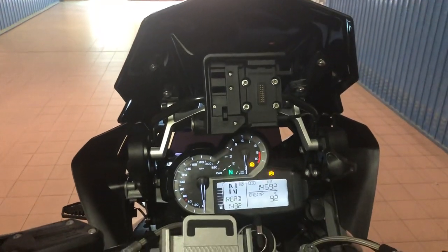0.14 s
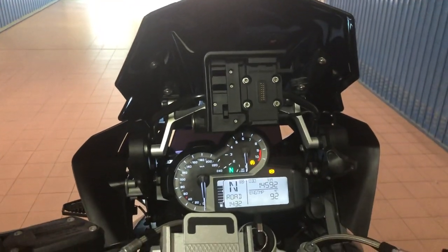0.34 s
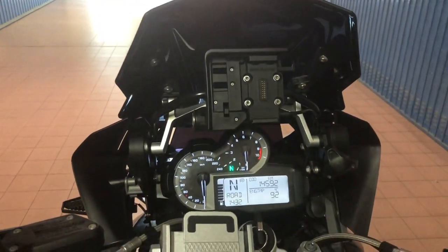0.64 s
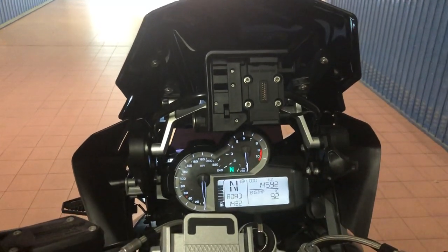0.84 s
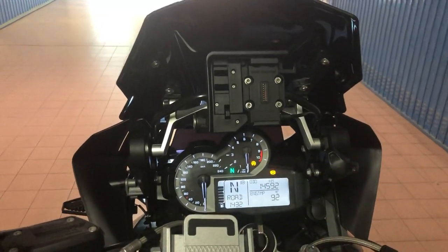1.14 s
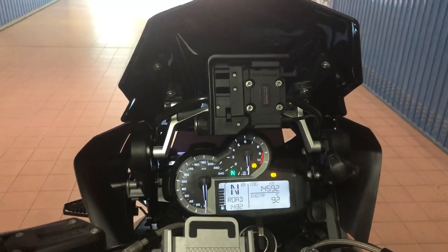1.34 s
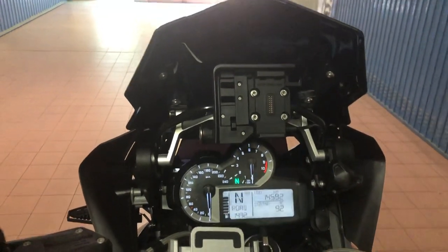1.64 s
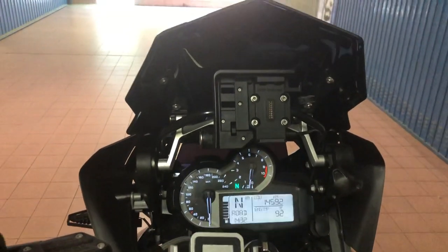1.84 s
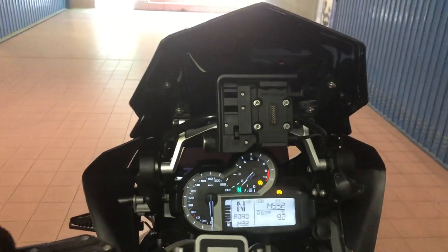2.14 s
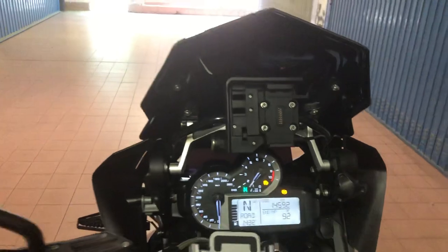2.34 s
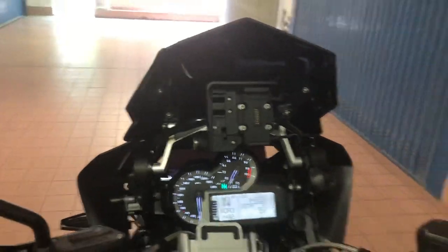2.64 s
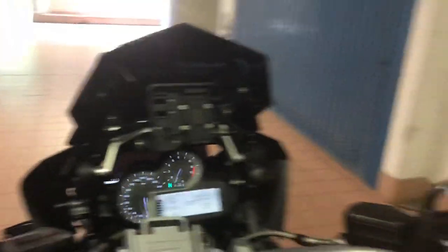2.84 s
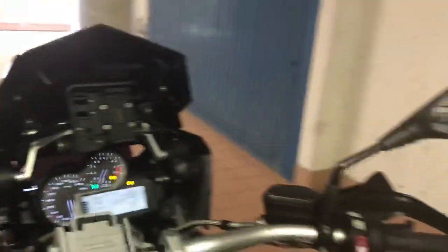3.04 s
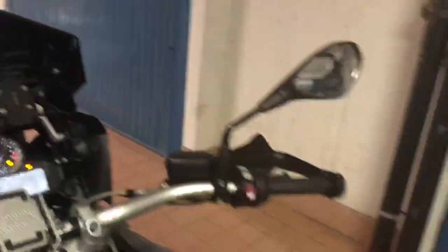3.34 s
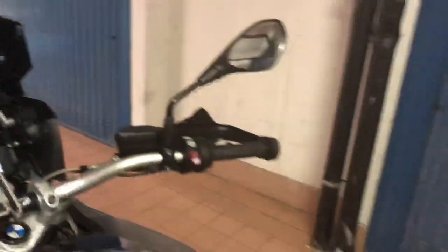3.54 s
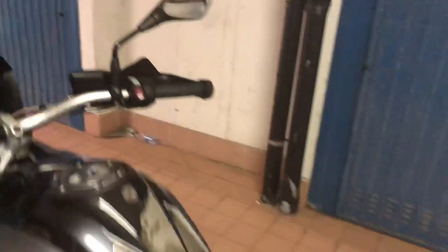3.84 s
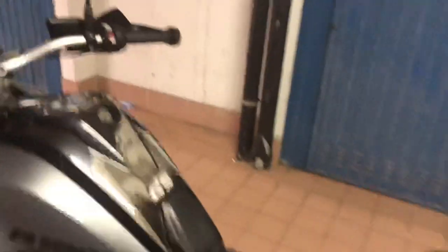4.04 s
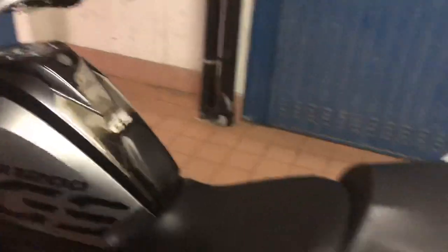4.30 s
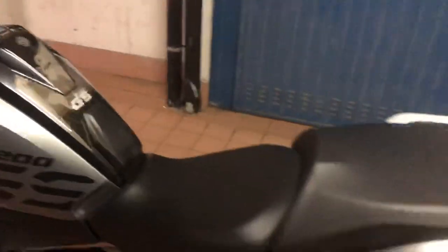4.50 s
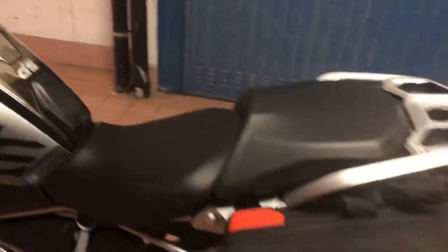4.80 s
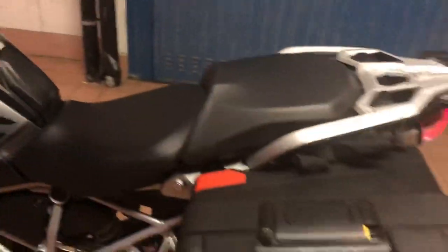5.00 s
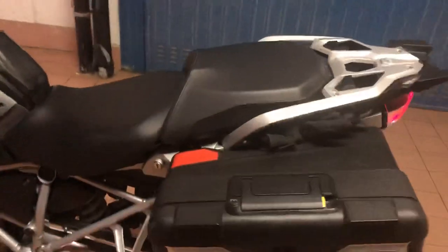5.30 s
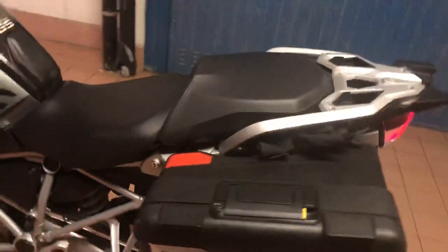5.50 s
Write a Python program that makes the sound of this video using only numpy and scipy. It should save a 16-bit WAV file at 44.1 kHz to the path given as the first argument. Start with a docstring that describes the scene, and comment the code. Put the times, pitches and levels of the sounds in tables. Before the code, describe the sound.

In a reverberant tiled corridor, faint low electric hum is broken by a loud switch snap at the handlebars. Small clicks and a soft whirr lead to a short, sagging starter whine; the motorcycle catches with heavy booming bangs, revs quickly sink, and it idles evenly. The close microphone moves back past the tank to the tail, where the deep exhaust throb grows more direct.

```python
"""Motorcycle start in a tiled corridor

A boxer-twin is started over a faint electric hum. Switches snap as noise bursts shaped by a body response.
The starter whines as harmonics of a gear-mesh rate that sags in two compressions. The engine catches with
bangs of decaying silencer modes, and its speed sinks to idle: one exhaust pulse a turn, filtered by place,
over impacts that ring the case. The microphone moves from the handlebars back towards the silencer."""
import sys
import numpy as np
from scipy import signal
from scipy.fft import irfft
from scipy.io import wavfile
from scipy.ndimage import uniform_filter1d

SR = 44100
rng = np.random.default_rng(int(sys.argv[2]) if len(sys.argv) > 2 else 0)


def transcribe(signal):
    """Save signal, clipped to [-1, 1], as a 16-bit WAV file at the path in sys.argv[1]."""
    frames = np.atleast_2d(signal).T
    limited = np.clip(frames, -1, 1)
    pcm = np.round(limited * 32767).astype(np.int16)
    wavfile.write(sys.argv[1], SR, pcm)


N = 249606
T = np.arange(N) / SR  # time, s
IDLE_HZ = 19.35  # nominal idle, firings a second

# mean engine speed from the first free turn to idle, one firing a turn: [t/s, firing rate/Hz]
SPEED_TRACK = [(1.9367, 30.33), (2.0, 29.76), (2.27, 25.4), (2.36, 20.72), (2.6, 19.366)]
# way of the microphone: [t/s, place: 0 handlebars, 1 tank, 2 tail]
MICROPHONE_PATH = [(3.45, 0.14), (3.95, 0.83), (4.5, 1.1), (4.75, 1.62), (5.66, 1.88)]

ENGAGE_S, DROP_S = 1.484, 1.825  # the starter engages and drops out, s


def amp(db):
    """Amplitude ratio of a level in decibels."""
    return 10 ** (np.asarray(db) / 20)


def unit(x):
    """Normalization to an rms of 1."""
    return x / np.sqrt(np.mean(x ** 2) + 1e-20)


def curve(rows):
    """Linear interpolation in time of rows [t/s, value]."""
    return np.interp(T, *np.transpose(rows))


def read(points, hz):
    """Interpolation of a spectrum on a logarithmic frequency axis."""
    f, value = np.transpose(points)
    return np.interp(np.log(hz + 1), np.log(f + 1), value)


def ring(points, size=16384):
    """Minimum-phase response: the Hilbert transform of the log gain gives the phase; energy 1."""
    log_gain = np.log(amp(read(points, np.fft.rfftfreq(size, 1 / SR))))
    mirrored = np.r_[log_gain, log_gain[-2:0:-1]]
    phase = -signal.hilbert(mirrored).imag[:len(log_gain)]
    h = irfft(np.exp(log_gain + 1j * phase))[:size // 2]
    return h / np.linalg.norm(h)


def through(x, h):
    """Linear filtering: convolution with an impulse response."""
    return signal.oaconvolve(x, h)[:N]


def noise():
    """White noise, a flat spectrum of rms 1."""
    return rng.standard_normal(N)


def strikes(rows):
    """Ideal impulses, one for each row [t/s, level/dB]."""
    s, db = np.transpose(rows)
    return np.bincount(np.round(s * SR).astype(int), amp(db), N)[:N]


def burst(decay_s, size=4096):
    """Noise under an exponential decay, as from a brief rubbing contact."""
    return rng.standard_normal(size) * np.exp(-np.arange(size) / SR / decay_s)


def hits(rows, colour, decay_s):
    """Struck bodies: noise bursts filtered by a body response, each scaled to its peak level."""
    out = np.zeros(N)
    body = ring(colour, size=4096)
    for s, db in rows:
        blow = signal.fftconvolve(burst(decay_s), body)
        part = out[round(s * SR):][:len(blow)]
        part += amp(db) * blow[:len(part)] / abs(blow).max()
    return out


def impacts(per_s, spread_db):
    """Poisson-like impacts of random sign, their levels spread exponentially above a floor."""
    size = amp(spread_db * np.minimum(rng.exponential(1, N), 4)) * rng.choice([-1, 1], N)
    return size * (rng.random(N) < per_s / SR)


def corridor(x, wet_db):
    """Reverberation of tiled walls: a diffuse tail whose bands each decay exponentially."""
    # reverberation time of the corridor: [f/Hz, t60/s]
    wall_decay = [(100, 1), (500, 0.88), (2800, 0.82), (6000, 1), (14000, 0.16)]
    hz, t, z = signal.stft(rng.standard_normal(SR), SR, nperseg=256)
    decay = amp(-60 * t / read(wall_decay, hz)[:, None])
    tail = signal.istft(z * decay, SR, nperseg=256)[1]
    tail *= np.minimum(np.arange(len(tail)) / SR / 0.003, 1)  # 3 ms onset
    return x + amp(wet_db) * through(x, tail / np.linalg.norm(tail))


def scatter(x, width_hz, count):
    """Standing waves as all-pass resonances: narrow bass bands are delayed at unchanged level."""
    r = np.exp(-np.pi * width_hz / SR)
    for hz in 60 + 380 * (np.arange(count) + rng.random(count)) / count:
        poles = np.array([1, -2 * r * np.cos(2 * np.pi * hz / SR), r * r])
        x = signal.lfilter(poles[::-1], poles, x)
    return x


def place():
    """Source-receiver geometry as one coordinate: 0 handlebars, 1 tank, 2 tail."""
    return np.clip(curve(MICROPHONE_PATH), 0, 2)


def speed():
    """Rotation rate as firings a second: a falling mean with a slow sinusoidal hunting."""
    swing_hz, period_s, top_s = 0.257, 1.031, 4.552
    return curve(SPEED_TRACK) + swing_hz * np.cos(2 * np.pi * (T - top_s) / period_s)


def revs():
    """Speed on an octave scale: doublings above idle."""
    return np.log2(speed() / IDLE_HZ)


def crank():
    """Crank phase in turns, the integral of speed since the engine began to run by itself."""
    return np.cumsum(speed() * (T >= SPEED_TRACK[0][0])) / SR


def firings():
    """Phase-locked ignition: the sample at which each whole turn is completed."""
    return np.flatnonzero(np.diff(np.floor(crank())) > 0)


def background():
    """Steady sound: electric hum as a sum of sinusoids, corridor air as filtered noise."""
    # hum lines: [f/Hz, rms level/dB]
    hum_lines = [(96.9, -71), (140.0, -53.5), (1997, -73.5), (4000, -84), (6002, -84), (9997, -87),
                 (13539, -83)]
    # spectrum of the air: [f/Hz, relative level/dB]
    air_colour = [(15, -26), (30, -4), (141, -1.5), (190, -7.5), (575, -24.5), (796, -42), (1890, -31.5),
                  (2050, -36), (2220, -54), (5880, -51), (11000, -47), (13200, -51), (16000, -58)]
    hum = 0
    for hz, db in hum_lines:
        hum = hum + amp(db) * np.sqrt(2) * np.sin(2 * np.pi * (hz * T + rng.random()))
    return hum + amp(-56) * through(noise(), ring(air_colour))


def switches():
    """Impulsive excitation: snaps of switches, relay and solenoid ring a body, a spring and the walls."""
    # snaps: [t/s, direct peak level/dB, low-pass corner f/Hz]
    click_rows = [(0.439, -34, 5060), (1.0063, -11.5, 13900), (1.3544, -34, 5000), (1.361, -30.5, 3200),
                  (1.4862, -32, 9000)]
    # body of the switch: [f/Hz, relative level/dB]
    switch_body = [(300, -19), (1000, -11.5), (1500, -10), (1850, 0), (2450, -16), (2860, 6), (3200, -9.5),
                   (4000, -4.5), (5200, -4.5), (6800, -9), (8700, -12), (12000, -7), (16000, -21)]
    body = ring(switch_body, size=4096)
    clicks = np.zeros(N)
    for s, db, top_hz in click_rows:
        snap = signal.unit_impulse(4096) + amp(-6) * burst(0.0025)  # a snap and its brief rattle
        snap = signal.lfilter(*signal.butter(2, top_hz, fs=SR), np.convolve(snap, body))
        clicks += through(strikes([(s, db)]), snap / abs(snap).max())

    # a soft whirr just before and as the starter engages
    whirr_colour = [(200, 12), (850, 6), (1500, 0), (3400, -5.5), (4400, -8), (5500, -8), (12000, -19)]
    whirr = through(noise(), ring(whirr_colour))
    whirr *= amp(-54) * curve([(1.36, 0.59), (1.4, 1), (1.5, 0.97), (1.55, 0)])

    # the walls receive the snap from all its sides, so its colour there is smoother
    wall_colour = [(300, -7), (1000, -6), (2600, -1.5), (2880, 4), (3200, -3), (5500, -10),
                   (12000, -9), (16000, -22)]
    impulses = strikes([row[:2] for row in click_rows])
    spread = through(impulses, ring(wall_colour))
    tail = corridor(spread, 0) - spread

    # the switch's spring rings on faintly
    t = T[:SR]
    spring = amp(-39) * np.exp(-t / 0.093) * np.sin(2 * np.pi * 2865 * t)
    clicks += corridor(through(impulses, spring), -10)
    return clicks + amp(-1.5) * tail + whirr


def hump(centre_s, half_s):
    """Raised-cosine window from 0 to 1 and back."""
    return np.cos(np.pi / 2 * np.clip((T - centre_s) / half_s, -1, 1)) ** 2


def cranking():
    """Motor under load: compression slows the mesh and raises its strain; gives Hz, gain, whine share."""
    # compressions: [top t/s, half length/s, added level/dB, added share of whine 0-1]
    compressions = [(1.596, 0.09, 7.5, 0.05), (1.806, 0.07, 13, 0.8)]
    mesh_hz, sag = 1579, 0.57  # free mesh rate, and share of it lost at a compression's top
    strain_lead_s = 0.04  # the strain peaks this long before the top
    spin = 1 - np.exp(-np.maximum(T - ENGAGE_S, 0) / 0.022)  # spin-up time constant, s
    hz, level_db, share = mesh_hz * spin, -23, 0.26  # running free
    for top_s, half_s, strain_db, whine in compressions:
        strain = hump(top_s - strain_lead_s, half_s)
        hz = hz * (1 - sag * hump(top_s, half_s))
        level_db = level_db + strain_db * strain
        share = share + whine * strain
    run_out = np.exp(-np.maximum(T - DROP_S, 0) / 0.014)  # run-out time constant, s
    return hz, amp(level_db) * spin * run_out, np.clip(share, 0, 1)


def starter():
    """Gear-mesh harmonics radiated by a housing, with grinding, freewheel hiss and puffs of pushed air."""
    # overtones of the mesh: [multiple, relative level/dB]
    overtones = [(1, 2.5), (2, 0), (3, -4.5), (4, -13), (5, -26), (6, -33)]
    # radiation of the whine by the housing: [f/Hz, gain/dB]
    housing = [(400, 5), (800, -9), (1130, 0.5), (1600, -6), (3000, -2.5), (3500, -9), (4600, -3.5),
               (6500, 0)]
    # grinding noise in the housing: [f/Hz, relative level/dB]
    grind_colour = [(88, -66), (150, -8.5), (226, -10.5), (414, -9), (790, -2), (941, -9.5), (1140, 2.5),
                    (1600, -3.5), (1720, -4), (3100, -11), (3490, -18), (3920, -10), (6770, -27),
                    (8900, -24), (16000, -45)]
    # air pushed by unfired pistons: [t/s, peak level/dB]
    puff_rows = [(1.682, -20), (1.738, -18.5)]
    mesh_hz, level, share = cranking()
    jitter = unit(uniform_filter1d(noise(), size=25))
    turns = np.cumsum(mesh_hz * (1 + 0.04 * jitter)) / SR
    whine = 0
    for k, db in overtones:
        whine = whine + amp(db + read(housing, k * mesh_hz)) * np.cos(2 * np.pi * k * turns)
    grind = through(noise(), ring(grind_colour))
    gears = np.sqrt(share) * whine + np.sqrt(1 - share) * grind

    # the freewheel clutch hisses, growing against the starter's level until drop-out
    hiss_colour = [(3000, -19), (7500, -11), (9100, -4.5), (10500, -15), (12500, -25), (16000, -24)]
    hiss_db, growth_db_per_s = -28.5, 47.5
    hiss = through(noise(), ring(hiss_colour))
    hiss *= amp(hiss_db + growth_db_per_s * (np.minimum(T, DROP_S) - ENGAGE_S))

    puff_colour = [(25, -30), (55, -8), (85, 0), (120, -5), (200, -42), (1000, -45), (8000, -75)]
    puffs = hits(puff_rows, puff_colour, 0.013)
    return corridor(level * (amp(-3.5) * gears + hiss), -4) + puffs


def faint_ticks():
    """Random selection of firings, each with a valve tick at a random delay: rows [t/s, level/dB]."""
    share, level_db, spread_db = 0.3, -29, 2.5  # level before the common tick gain
    at = firings()[:-1]
    chance, delay, size = rng.random((len(at), 3)).T
    rows = np.c_[at / SR + delay / IDLE_HZ, level_db + spread_db * (2 * size - 1)]
    # only after the microphone starts to move
    return rows[(chance < share) & (at / SR > MICROPHONE_PATH[0][0])].tolist()


def taps():
    """Isolated impacts: dull knocks of the drive, bright ticks of the valve gear."""
    # knocks while the engine starts: [t/s, peak level before the common gain/dB]
    knock_rows = [(1.6036, -17.5), (1.8031, -11), (1.8827, -12), (2.173, -14), (2.2638, -12)]
    # sharpest valve ticks: [t/s, peak level before the common gain/dB]
    tick_rows = [(3.5433, -27), (3.8023, -28), (4.0613, -26), (4.1236, -31), (4.587, -31), (4.8339, -28)]
    bright = [(1000, -8), (4000, -5.5), (8000, -11.5), (14000, -10.5), (16000, -27)]
    dull = [(400, -12), (900, -12), (1150, 1), (1400, -2), (1650, 1), (3000, -23), (6000, -17.5),
            (16000, -39)]
    ticks = hits(tick_rows + faint_ticks(), bright, 0.013)
    knocks = hits(knock_rows, dull, 0.0053)
    return corridor(amp(11) * ticks + amp(5) * knocks, -5)


def clatter():
    """Modal excitation: dense impacts ring the case and covers, stronger once a turn as valves shut."""
    # engine case: [f/Hz, relative level/dB]
    case_colour = [(200, -0.5), (450, -8.5), (600, -6.5), (950, -5.5), (1080, 0.5), (1250, -7),
                   (1400, -4.5), (1620, -2), (3000, -4.5), (3700, -8), (4500, -10), (6500, -13.5),
                   (11000, -17), (16000, -25.5)]
    # modes of the cylinder heads and covers: [f/Hz, relative level/dB, t60/s]
    cover_modes = [(1075.4, 0.5, 0.089), (1194.5, 2, 0.13), (1259, 3, 0.086), (1590, -1, 0.038),
                   (1760, -11, 0.027), (2140, -4.5, 0.044), (2500, -6.5, 0.011), (3140, -4, 0.029),
                   (4530, -4, 0.03)]
    turns = crank()
    force = amp(3.1 * rng.standard_normal(256))[turns.astype(int)]  # a new force each turn
    valves = force * np.exp(-((turns % 1 - 0.61) / 0.083) ** 2)  # phase and width in turns
    stroke = np.sqrt(1 + amp(-4) * valves)
    drive = unit(impacts(per_s=2200, spread_db=0)) + noise()
    case = unit(through(drive * stroke, ring(case_colour)))

    t, covers = T[:SR // 6], 0
    for hz, db, t60 in cover_modes:
        mode = amp(-60 * t / t60) * np.sin(2 * np.pi * hz * t)
        covers = covers + amp(db) * unit(through(impacts(per_s=110, spread_db=3) * stroke, mode))
    case = unit(case + amp(-4.5 - 2.5 * place()) * unit(covers))

    treble = signal.sosfiltfilt(signal.butter(2, 5000, "high", fs=SR, output="sos"), case)
    case = case + treble * (amp(-0.5 + 0.1 * place()) - 1)
    running = np.clip((T - 1.79) / 0.068, 0, 1)  # fades in as the engine starts
    # level at idle, gain per doubling of the speed, gain per place towards the tail, dB
    level_db, rev_db, place_db = -23.5, 7.5, 0.02
    return case * running * amp(level_db + rev_db * revs() + place_db * place())


def catch():
    """Impulse response of silencer modes: the first hard firings ring it higher than at idle."""
    # first firings: [t/s, direct peak level/dB]
    bang_rows = [(1.8255, 3), (1.9015, 2.5), (1.938, -0.5)]
    # silencer modes: [f/Hz, relative level/dB, t60/s]
    modes = [(82, -10, 0.46), (172, -6.5, 0.087), (241, 4, 0.12), (259, -5.5, 0.15),
             (336.2, -11.5, 0.39), (409, -15, 0.17)]
    t = T[:SR // 3]
    bang = sum(amp(db - 60 * t / t60) * np.cos(2 * np.pi * hz * t) for hz, db, t60 in modes)
    bang = signal.sosfilt(signal.butter(2, [70, 480], "band", fs=SR, output="sos"), bang)
    return corridor(through(strikes(bang_rows), bang / abs(bang).max()), -4)


def beat_db():
    """Source level of the exhaust: grows with speed, just after the catch, and towards the tail."""
    level_db, rev_db, place_db = -19, 3.5, 0.98  # at idle, per doubling of speed, per place
    rich_db, rich_s = 14.5, 0.046  # the first firings are richer; decay time constant
    rich = np.exp(-np.maximum(T - SPEED_TRACK[0][0], 0) / rich_s)
    return level_db + rev_db * revs() + rich_db * rich + place_db * place()


def idle_colour(orders):
    """Order spectrum: multiples of the idle rate turned into Hz, closed at both ends."""
    lines = [(k * IDLE_HZ, db) for k, db in orders]
    return [(7.3, -56)] + lines + [(520, -47.5), (900, -69), (3000, -85)]


def exhaust():
    """Pulse radiation: each firing sends a pulse and turbulent gas through silencer and corridor."""
    # idle exhaust as the corridor colours it, at each place: [multiple of idle rate, relative level/dB]
    bars_orders, tank_orders, tail_orders = [(1, -42), (2, -18.5), (3, -15.5), (4, -2.5), (5, -13.5),
                                             (6, 2.5), (7, -8), (8, -3.5), (9, -27.5), (10, -15), (11, -6),
                                             (12, -8), (13, -14), (14, -11), (15, -17), (16, -25),
                                             (17, -29), (18, -16), (19, -23.5), (20, -22.5), (21, -24),
                                             (22, -20)], [(1, -45), (2, -23), (3, -55), (4, -3),
                                                              (5, -1), (6, -1), (7, -4), (8, -2.5),
                                                              (9, -14.5), (10, -3.5), (11, -0.5),
                                                              (12, -6.5), (13, -12.5), (14, -13), (15, -7),
                                                              (16, -15.5), (17, -16.5), (18, -17.5),
                                                              (19, -11), (20, -17), (21, -14.5),
                                                              (22, -31.5)], [(1, -44), (2, -42), (3, -25),
                                                                               (4, -18), (5, -9), (6, 0),
                                                                               (7, -8.5), (8, -18),
                                                                               (9, -26.5), (10, -14.5),
                                                                               (11, -6.5), (12, -34.5),
                                                                               (13, -11.5), (14, -27),
                                                                               (15, -21.5), (16, -18.5),
                                                                               (17, -24), (18, -28),
                                                                               (19, -23), (20, -13.5),
                                                                               (21, -35), (22, -22)]
    # exhaust under the load of the start: [f/Hz, relative level/dB]
    loaded_colour = [(30, -55), (60, -5), (86, 4), (100, -14), (116, 8), (140, -12.5), (175, -1.5),
                     (232, 5.5), (275, -5), (315, -2.5), (350, -7), (410, -8), (500, -22.5), (900, -21.5)]
    # loaded share of the exhaust power: [t/s, share 0-1]
    load_track = [(1.8, 0.9), (2.2, 0.52), (2.4, 0.24), (2.9, 0), (3.2, 0.12)]
    at, load, where = firings(), curve(load_track), place()
    uneven_db = 0.86 * rng.standard_normal(len(at))
    pulses = np.zeros(N)
    pulses[at] = amp(beat_db()[at] + uneven_db) * np.sqrt(SR / speed()[at])

    spill = np.exp(-T[:SR // 4] / 0.049)  # turbulence dies away after each pulse
    rough = np.interp(where, [0, 2], [0.59, 0.27])  # its ratio to the pulse, handlebars to tail
    gas = pulses + rough * through(pulses, spill / np.linalg.norm(spill)) * noise()

    heard = []
    for k, orders in enumerate([bars_orders, tank_orders, tail_orders]):
        nearness = np.maximum(1 - abs(where - k), 0)
        heard.append(through(gas * np.sqrt(1 - load) * nearness, ring(idle_colour(orders))))
    bars, tank, tail = heard
    loaded = through(gas * np.sqrt(load), ring(loaded_colour + [(3000, -81)]))

    # the walls return the upper notes late, filling the gaps between the beats
    upper = signal.sosfilt(signal.butter(3, 165, "high", fs=SR, output="sos"), tank + 0.4 * tail)
    walls = scatter(upper, width_hz=22, count=11)
    # the handlebars hear mostly reflections; further back the silencer is heard directly
    reflected = scatter(bars + loaded, width_hz=13, count=8)
    return reflected + tank + tail + amp(-5) * walls


def scene():
    """Superposition of all sources at one microphone."""
    machine = starter() + taps() + clatter() + catch() + exhaust()
    return (background() + switches() + machine)[None]


def record(dry):
    """Receiver response: bass cut, soft saturation of the loudest peaks, then a band limit."""
    dry = signal.sosfilt(signal.butter(4, 32, "high", fs=SR, output="sos"), dry)
    held = dry / (1 + dry ** 8) ** (1 / 8)
    band_limit = signal.firwin(511, 15950, window=("kaiser", 9), fs=SR)
    return signal.oaconvolve(held, band_limit[None], "same")


dry = scene()
out = record(dry)
transcribe(out)
```